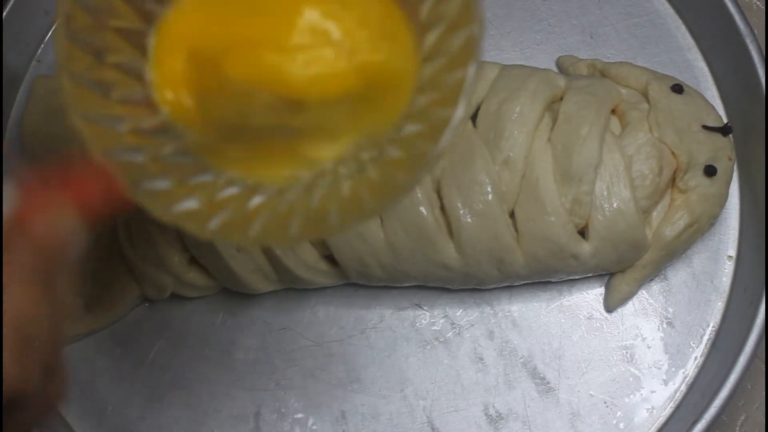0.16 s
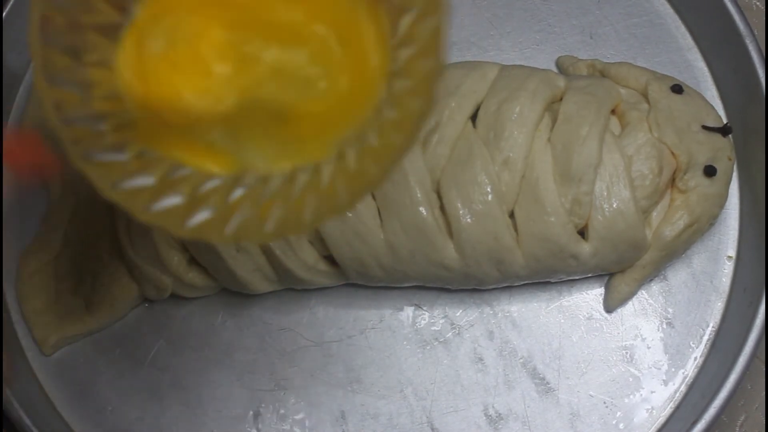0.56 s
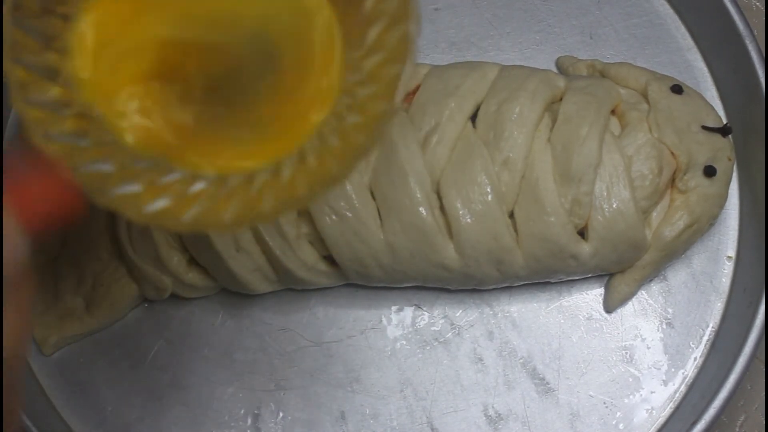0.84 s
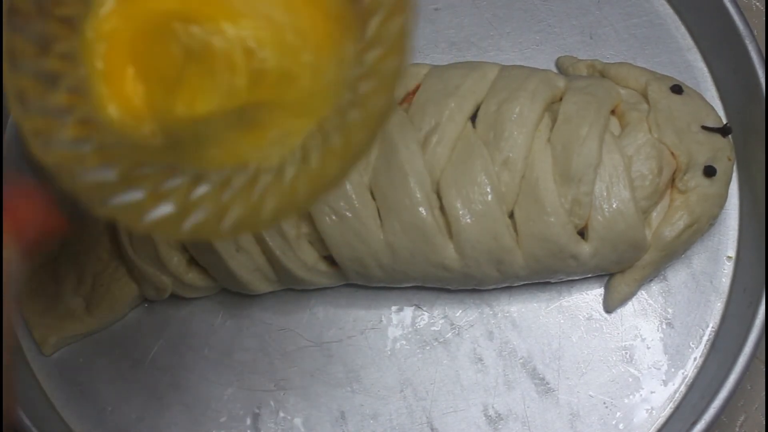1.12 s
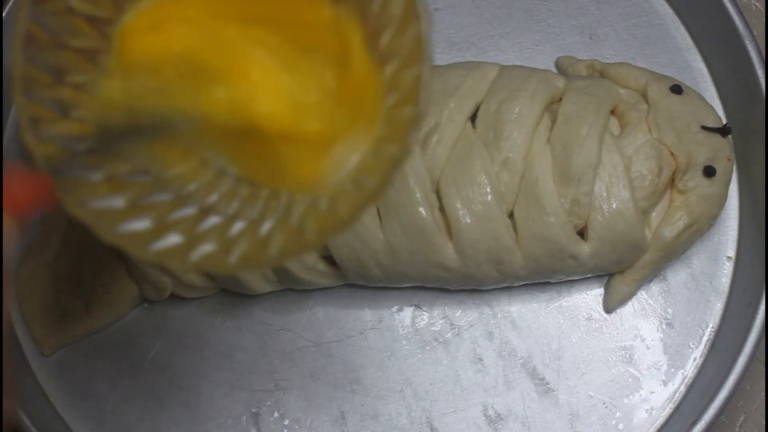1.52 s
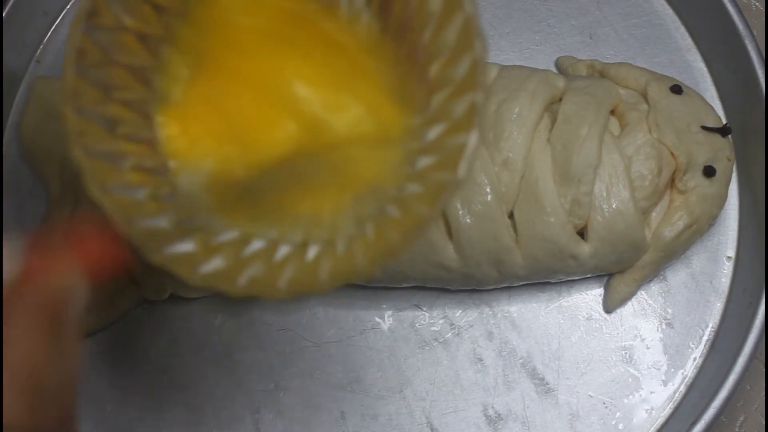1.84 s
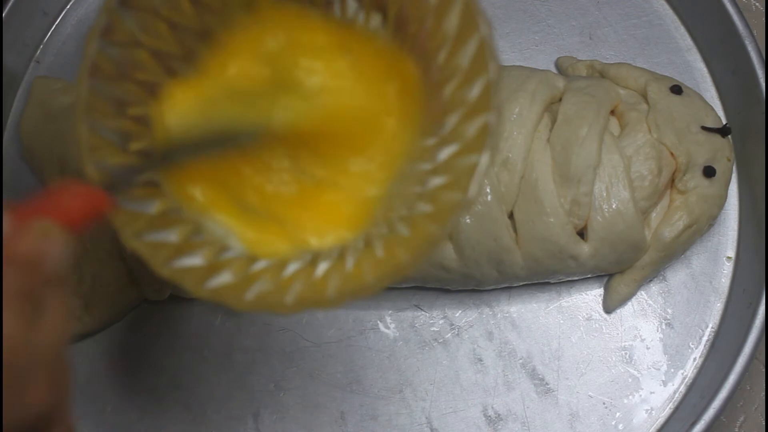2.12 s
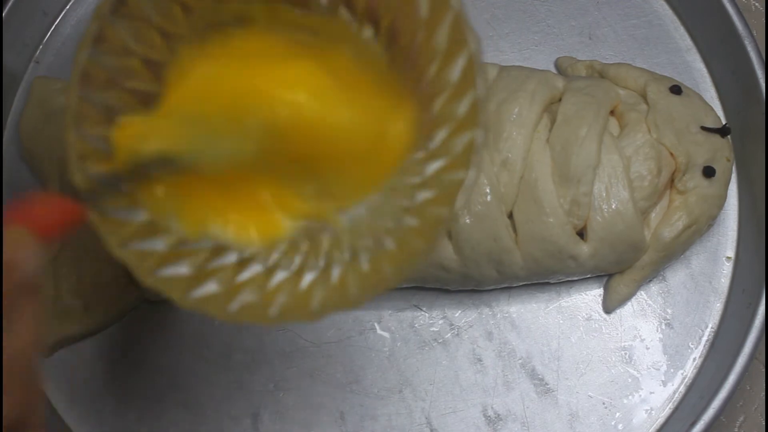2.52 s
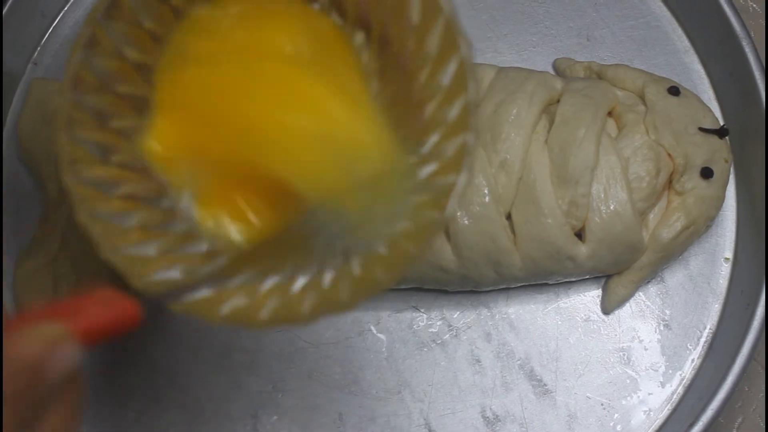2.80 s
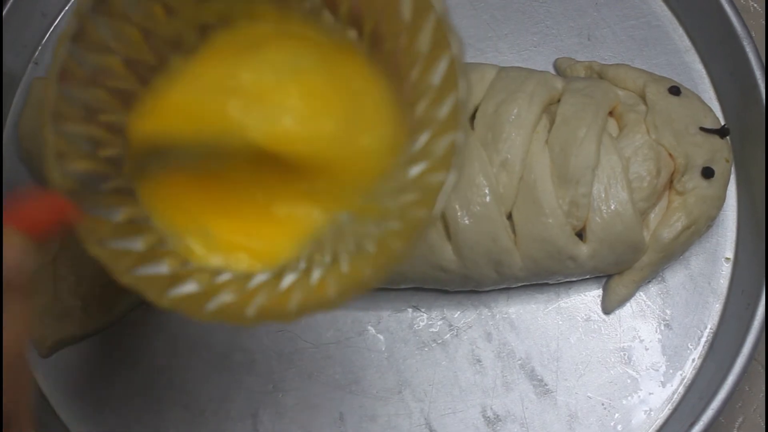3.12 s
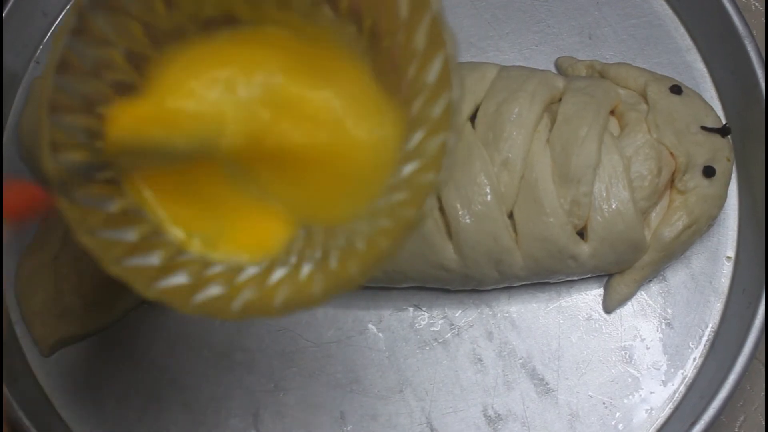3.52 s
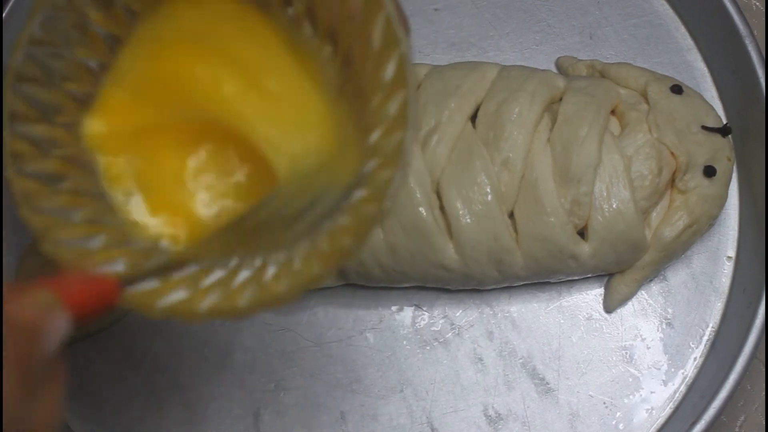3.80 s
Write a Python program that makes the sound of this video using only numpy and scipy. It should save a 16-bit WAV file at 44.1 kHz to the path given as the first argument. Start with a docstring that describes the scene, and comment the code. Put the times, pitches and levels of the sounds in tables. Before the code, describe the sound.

Fast, steady egg beating: metal tines click brightly on egg-damped glass, ringing the rim briefly on a few early strokes, then duller and wetter, with light scrapes and soft thuds, heard close in a small quiet kitchen.

```python
"""A quiet kitchen: a steel fork beats an egg in a small hand-held glass bowl, about five strokes a second.
Each stroke lands as a few tine contacts: a bright tick of decaying modes plus a noise crack, a short knock
of the egg-damped wall and bottom, sometimes a free ring of the rim in beating sines. Wet tines patter on as
random clicks into resonators; some scrape, some strokes thud. A noise tail answers as the room, over faint
hum, hiss and tones."""
import sys
import numpy as np
from scipy import signal
from scipy.io import wavfile

SR = 44100
rng = np.random.default_rng(int(sys.argv[2]) if len(sys.argv) > 2 else 0)


def unload_audio(sound):
    """Save the sound as a 16-bit wav file, at the path given as the first command line argument."""
    columns = np.transpose(np.atleast_2d(sound))
    # keep every value between -1 and 1, then stretch to whole-number steps
    steps = np.round(np.clip(columns, -1, 1) * 32767)
    wavfile.write(sys.argv[1], SR, steps.astype(np.int16))


N = 174195

# Tine contacts, shared by ticks, knocks and patter. Each row: start in seconds, tick level in dB,
# wall level in dB, wall pitch in Hz, bottom level in dB, bottom pitch in Hz.
TINE_CONTACTS = [(0.0997, -13, -33, 2430, -23, 1596), (0.1219, -39, -31.5, 3210, -33, 1690),
                 (0.156, -37, -48, 3230, -42.5, 1560), (0.162, -37.5, -47, 2530, -45, 1550),
                 (0.2284, -47.5, -72, 2160, -55, 800), (0.2799, -7.5, -14.5, 2790, -58.5, 1800),
                 (0.2874, -15, -55.5, 3760, -41, 1560), (0.31, -52, -43, 2730, -37, 1090),
                 (0.322, -33.5, -32, 2160, -40, 1810), (0.3246, -22, -32, 2260, -40, 1690),
                 (0.4296, -44, -58, 3800, -59.5, 1150), (0.4507, -46, -66, 2670, -63, 1130),
                 (0.4821, -4.5, -19, 3920, -25, 1670), (0.4955, -46.5, -46, 3900, -31.5, 1730),
                 (0.5022, -32, -53, 3160, -33.5, 1870), (0.5225, -32, -31, 3360, -36.5, 1800),
                 (0.6779, -35, -48.5, 2880, -51.5, 1350), (0.6843, -13.5, -33.5, 3890, -32, 1480),
                 (0.6994, -21.5, -32.5, 3180, -44, 1366), (0.861, -20, -43, 3190, -60.5, 1410),
                 (0.8746, -15, -36, 4930, -37.5, 1700), (0.889, -24.5, -29.5, 3440, -42.5, 1770),
                 (0.898, -31.5, -36.5, 2710, -58, 1910), (1.0506, -8.5, -19.5, 3890, -32.5, 1410),
                 (1.0605, -9, -27, 3820, -58, 1710), (1.0767, -40, -27.5, 2485, -40.5, 1015),
                 (1.0854, -48, -50, 3250, -58, 1740), (1.18, -57, -52, 3820, -61, 1640),
                 (1.1995, -40, -42, 2780, -39.5, 1465), (1.22, -55, -58.5, 3800, -53, 1504),
                 (1.2382, -14.5, -30.5, 2820, -18, 920), (1.2438, -24.5, -22.5, 3955, -33, 920),
                 (1.2472, -12.5, -36, 2760, -19.5, 1315), (1.258, -25, -28.5, 3070, -44, 1420),
                 (1.2745, -23, -26, 4150, -36, 1150), (1.355, -50.5, -52, 3800, -60, 1220),
                 (1.427, -30.5, -41.5, 4150, -49, 1410), (1.4354, -13, -31.5, 2890, -30.5, 1627),
                 (1.4569, -19, -34.5, 2600, -47, 1410), (1.629, -15, -36, 3210, -42.5, 1370),
                 (1.6418, -26.5, -34.5, 2360, -41.5, 2080), (1.6523, -41, -38.5, 3250, -51, 1370),
                 (1.812, -33, -64, 3770, -56, 970), (1.823, -18.5, -33, 2110, -31.5, 1550),
                 (1.8354, -22.5, -30, 2384, -47, 1584), (1.8524, -42, -36, 3250, -44.5, 1770),
                 (1.9996, -33.5, -43.5, 2620, -43, 1603), (2.0252, -16, -35.5, 3560, -44.5, 2040),
                 (2.04, -16, -27, 3650, -58.5, 2020), (2.1748, -15.5, -37, 2130, -22, 1730),
                 (2.207, -15, -38, 3830, -28.5, 1555), (2.2291, -34.5, -31.5, 3250, -47.5, 1690),
                 (2.3954, -18, -32.5, 2650, -41, 1810), (2.4056, -14.5, -29, 3720, -28.5, 1607),
                 (2.4278, -24.5, -31.5, 3250, -48, 1736), (2.4447, -43, -39, 3310, -44, 1125),
                 (2.4665, -41, -37.5, 3360, -62, 1630), (2.5938, -37.5, -42, 2520, -68, 1200),
                 (2.6049, -12, -21.5, 3740, -26, 1548), (2.6256, -18, -27.5, 3160, -34.5, 1730),
                 (2.8097, -17, -27, 3210, -38, 1550), (2.811, -34, -33, 2730, -30.5, 1333),
                 (2.8187, -16.5, -23, 3710, -20.5, 1492), (2.8463, -49, -35, 3220, -38.5, 1553),
                 (2.8782, -42, -36.5, 3380, -66, 1520), (3, -32.5, -45.5, 3650, -55, 1576),
                 (3.0138, -12, -33.5, 3740, -30, 1620), (3.025, -37.5, -29, 2620, -53, 1500),
                 (3.0584, -35.5, -29, 2390, -35.5, 1800), (3.216, -12, -33, 2720, -33.5, 1646),
                 (3.2345, -39, -35, 3700, -32.5, 1310), (3.253, -41, -28.5, 4070, -52, 1780),
                 (3.339, -44, -52, 2570, -53, 1260), (3.4027, -40, -36, 3880, -49.5, 1486),
                 (3.4118, -11.5, -42, 4020, -31, 1533), (3.418, -27.5, -29.5, 3000, -43.5, 1480),
                 (3.4332, -16, -25.5, 3230, -44, 2060), (3.48, -37.5, -39.5, 3370, -46, 2020),
                 (3.6108, -11, -35.5, 3530, -33, 1630), (3.6229, -33, -37, 3310, -41.5, 1950),
                 (3.7692, -18, -39, 2300, -35, 1700), (3.7899, -43.5, -46, 3710, -47, 1790),
                 (3.8035, -13.5, -37, 2130, -32.5, 1650), (3.83, -29, -33, 2310, -34.5, 1727),
                 (3.8338, -18, -35, 3380, -37, 1586)]
# Bright modes of tines and glass. Each row: frequency in Hz, level in dB relative to the other modes.
TICK_PARTIALS = [(5300, -13), (6410, -13), (7590, -13), (8910, -11.5), (9990, -15), (11400, -4.5),
                 (12600, -8.5), (13700, -10.5), (15500, -16.5)]
TICK_T60_S, TICK_RISE_S = 0.007, 0.00015
TICK_DETUNE_RATIO, TICK_SPREAD_DB = 0.02, 4
CRACK_DECAY_S, CRACK_DB = 0.0012, -6
TICK_HIGHPASS_HZ = 4800


def ticks():
    """Bright modes start together, strength and pitch shifting with the spot hit; a short crack joins in."""
    start_s, tick_db = np.transpose(TINE_CONTACTS)[:2]
    t = np.arange(3000) / SR
    hz, level_db = np.transpose(TICK_PARTIALS)
    luck = rng.standard_normal((len(start_s), len(t) + 2 * len(hz)))
    hiss = luck[:, :len(t)]
    strength, detune = np.split(luck[:, len(t):, None], 2, axis=1)
    mode_hz = hz[:, None] * (1 + TICK_DETUNE_RATIO * detune)
    modes = amp(level_db[:, None] + TICK_SPREAD_DB * strength) * np.sin(2 * np.pi * mode_hz * t)
    crack = amp(CRACK_DB) * hiss * np.exp(-t / CRACK_DECAY_S)
    tick = amp(-60 * t / TICK_T60_S) * modes.sum(axis=1) + crack
    tick = tick * (1 - np.exp(-t / TICK_RISE_S))
    tick = signal.sosfilt(signal.butter(4, TICK_HIGHPASS_HZ, "high", fs=SR, output="sos"), tick)
    # equal energy per tick before its level: 40 samples' worth of unit power
    unit_tick = tick / np.sqrt(np.sum(tick ** 2, axis=1, keepdims=True) / 40)
    return lay(start_s, amp(tick_db[:, None]) * unit_tick)


# Egg-damped bowl modes stirred by every knock.
# Each row: frequency in Hz, level in dB relative to the knock, T60 in seconds.
DAMPED_MODES = [(920, -30, 0.033), (1315, -26, 0.017), (1539, -14, 0.073), (1730, -5, 0.016),
                (2320, -15, 0.026), (2720, -11.5, 0.014), (3250, -5, 0.023), (3880, -11.5, 0.045)]
BOWL_SPLIT_HZ = 2000  # modes above follow the wall level, the rest the bottom level
WALL_T60_S, BOTTOM_T60_S = 0.031, 0.04
WALL_RISE_S, BOTTOM_RISE_S = 0.00018, 0.00028


def knocks():
    """Wall and bottom knock at a pitch set by how the egg lies, and stir the other damped modes."""
    start_s, _, wall_db, wall_hz, bottom_db, bottom_hz = np.transpose(TINE_CONTACTS)
    out, t = np.zeros(N), np.arange(4000) / SR
    parts = ((wall_db, wall_hz, WALL_T60_S, WALL_RISE_S),
             (bottom_db, bottom_hz, BOTTOM_T60_S, BOTTOM_RISE_S))
    for db, hz, t60_s, rise_s in parts:
        tone = amp(db[:, None] - 60 * t / t60_s) * np.sin(2 * np.pi * hz[:, None] * t)
        out += lay(start_s, tone * (1 - np.exp(-t / rise_s)))
    luck = rng.standard_normal((len(start_s), len(DAMPED_MODES)))
    for k, (hz, level_db, t60_s) in enumerate(DAMPED_MODES):
        db = wall_db if hz > BOWL_SPLIT_HZ else bottom_db
        sign, spread = np.sign(luck[:, k]), amp(3 * luck[:, k - 1])
        push = clicks_at(start_s, amp(db + level_db) * sign * spread)
        # subtracting a fast-dying copy softens the onset
        out += ring(push, hz, t60_s) - ring(push, hz, WALL_RISE_S * np.log(1000))
    return out


# Blows above the egg. Each row: start in seconds, level in dB of each of the four free modes in turn,
# level in dB of each shimmer mode, time in seconds until egg washes over the rim.
RIM_STRIKES = [(.001, -53, -62, -72, -71, -80, 0.05), (.289, -46, -37, -52, -64, -70, 0.18),
               (0.481, -40, -41, -46, -56, -52, 0.19), (1.059, -40, -50, -52, -44, -62, 0.11),
               (1.245, -60, -38, -52, -56, -60, 0.06), (2.176, -58, -48, -52, -56, -62, 0.04)]
# Free rim modes. Each row: frequency in Hz, T60 in seconds.
FREE_RIM_MODES = [(1753, .4), (3876, .45), (6510, .35), (9760, .18)]
RIM_WASH_DECAY_S = 0.018
TWIN_OFFSET_HZ, TWIN_DB = 14, -10  # offset is scaled by 0.5 to 1.5 per blow
SHIMMER_HZ, SHIMMER_T60_S = (6440, 7700), 0.24  # T60 is scaled by 0.5 to 1.5 per mode


def rim():
    """Clean blows ring the free glass: each mode beats with a weaker twin, a crowd of weak modes shimmers."""
    start_s, *mode_db, shimmer_db, free_s = np.transpose(RIM_STRIKES)[:, :, None]
    t = np.arange(SR // 3) / SR
    luck = rng.random((len(start_s), 3, 20, 1))
    tones = 0
    for k, (hz, t60_s) in enumerate(FREE_RIM_MODES):
        twin_hz = hz + TWIN_OFFSET_HZ * (0.5 + luck[:, 0, k])
        twin = amp(TWIN_DB) * np.sin(2 * np.pi * (twin_hz * t + luck[:, 1, k]))
        pair = np.sin(2 * np.pi * hz * t) + twin
        tones = tones + amp(mode_db[k] - 60 * t / t60_s) * pair
    crowd_hz = SHIMMER_HZ[0] + np.ptp(SHIMMER_HZ) * luck[:, 2]
    crowd_t60_s = SHIMMER_T60_S * (0.5 + luck[:, 0])
    crowd = amp(-60 * t / crowd_t60_s) * np.sin(2 * np.pi * (crowd_hz * t + luck[:, 1]))
    tones = tones + amp(shimmer_db) * crowd.sum(axis=1)
    wash = np.exp(-np.maximum(t - free_s, 0) / RIM_WASH_DECAY_S)
    return lay(start_s[:, 0], tones * wash)


# Patter spectrum. Each row: frequency in Hz, level in dB.
PATTER_COLOUR = [(1100, -15.5), (1600, -3), (2200, 0), (2850, 5.5), (3280, 10), (3700, 2.5), (4400, -4),
                 (7000, 6.5), (16000, -4.5)]
PATTER_PER_S, PATTER_T60_S = 4000, 0.14
PATTER_DB = -20.5  # relative to the wall level of the contact that starts it
PATTER_UNEVEN_DB, PATTER_CLUMP_DB = 3.03, 3


def patter():
    """Small wet contacts, random clicks dealt to short resonators, die away after every landing."""
    start_s, _, wall_db = np.transpose(TINE_CONTACTS)[:3]
    power_decay = amp(-120 / (PATTER_T60_S * SR))  # 60 dB of power per T60
    power = signal.lfilter([1], [1, -power_decay], clicks_at(start_s, amp(2 * wall_db)))
    sizes = amp(PATTER_UNEVEN_DB * np.minimum(rng.exponential(1, N), 4)) * rng.choice([-1, 1], N)
    hits = rng.random(N) < PATTER_PER_S / SR
    grains = np.sqrt(power) * sizes * hits * amp(PATTER_CLUMP_DB * drift(90))
    dealt, pitches_hz = rng.integers(0, 36, N), np.geomspace(1100, 15500, 36)
    out = np.zeros(N)
    for k, hz in enumerate(pitches_hz):
        out += amp(at_hz(PATTER_COLOUR, hz)) * ring(grains * (dealt == k), hz, 53.7 / hz)
    return amp(PATTER_DB) * out


# Wet tines dragged along the wall. Each row: start in seconds, length in seconds, slip level in dB.
TINE_SCRAPES = [(2.222, 0.076, -48), (2.43, 0.056, -52), (2.63, 0.052, -48.5), (2.84, 0.047, -51.5)]
SLIPS_PER_S, SCRAPE_HZ, SCRAPE_T60_S = 900, (3200, 3300, 3480), 0.03


def scrapes():
    """Dense random slips, swelling and fading over each drag, stir the wall modes near 3.3 kHz."""
    t = np.arange(N) / SR
    stroke = np.zeros(N)
    for start_s, length_s, db in TINE_SCRAPES:
        stroke += amp(db) * np.sin(np.pi * np.clip((t - start_s) / length_s, 0, 1))
    out = np.zeros(N)
    for hz in SCRAPE_HZ:
        slips = stroke * rng.standard_normal(N) * (rng.random(N) < SLIPS_PER_S / SR)
        out += ring(slips, hz, SCRAPE_T60_S)
    return out


# Dull thuds of egg and hand. Each row: start in seconds, noise level in dB before the envelope.
DULL_THUDS = [(.482, -61), (1.272, -51), (1.83, -49.5), (2.819, -48.5), (3.233, -51), (3.395, -44.5)]
THUD_BAND_HZ, THUD_DECAY_S = (173.2, 740), 0.019


def thuds():
    """Egg and hand give short puffs of low band-passed noise under some strokes."""
    start_s, db = np.transpose(DULL_THUDS)
    t = np.arange(4000) / SR
    band = signal.butter(2, THUD_BAND_HZ, "band", fs=SR, output="sos")
    puff = signal.sosfilt(band, rng.standard_normal((len(start_s), len(t))))
    envelope = np.sqrt(t / THUD_DECAY_S) * np.exp(-t / THUD_DECAY_S)
    return lay(start_s, amp(db[:, None]) * puff / puff.std() * envelope)


# Room decay. Each row: frequency in Hz, T60 in seconds.
ROOM_DECAY = [(700, 0.34), (2100, 0.31), (5500, 0.22), (14000, 0.15)]
ROOM_DB, ROOM_FADE_IN_S = -16.5, 0.0014


def kitchen(x):
    """The room answers with a noise tail that dies band by band."""
    t = np.arange(SR // 2) / SR
    white = rng.standard_normal(len(t))
    tail = np.zeros(len(t))
    for hz, sos in bands(300, 17000, count=10):
        tail += signal.sosfilt(sos, white) * amp(-60 * t / at_hz(ROOM_DECAY, hz))
    tail = tail * np.clip(t / ROOM_FADE_IN_S, 0, 1)
    unit_tail = tail / np.sqrt(np.sum(tail ** 2))
    return amp(ROOM_DB) * signal.fftconvolve(x, unit_tail)[:N]


# Low background level. Each row: time in seconds, level in dB.
HUM_LEVEL = [(0, -58), (0.501, -62), (1.3, -63.5), (2.3, -59), (3.4, -57.5), (3.95, -64)]
# Low background spectrum. Each row: frequency in Hz, relative density in dB per Hz.
HUM_SPECTRUM = [(45, -8.5), (70, -26), (100, -6.5), (130, -3), (200, -2.5), (240, -7), (300, -5), (600, -9),
                (1000, -11.5)]
PATCHY_DB = 1.2  # band flicker, hum and hiss


def hum():
    """Low noise shaped by band, its level following a slow curve."""
    level_db = np.interp(np.arange(N) / SR, *np.transpose(HUM_LEVEL))
    return amp(level_db) * noise(HUM_SPECTRUM, 37.6, 1097, PATCHY_DB)


# Hiss spectrum. Each row: frequency in Hz, relative density in dB per Hz.
HISS_SPECTRUM = [(700, -14), (1500, 2), (3000, -4.5), (5000, -10.5), (9000, -17.5), (16000, -16)]
HISS_DB = -62.5


def hiss():
    """Steady-level noise shaped by band, each band flickering."""
    return amp(HISS_DB) * noise(HISS_SPECTRUM, 800, 16000, PATCHY_DB)


# Wavering lines in the hum. Each row: centre frequency in Hz, centre level in dB.
HUM_LINES = [(100, -71.5), (200, -70.5), (300, -71.5)]
# Faint passing tones. Each row: start in seconds, length in seconds, first Hz, last Hz, level in dB.
GLIDING_TONES = [(2.12, .24, 560, 545, -65), (2.5, .3, 1170, 1230, -70), (3.07, .14, 420, 415, -65)]


def background_tones():
    """Sines with drifting pitch and level form the hum lines; brief sines glide, swell and fade."""
    t = np.arange(N) / SR
    out = np.zeros(N)
    for hz, db in HUM_LINES:
        level = amp(db + 3 * drift(12))
        out += level * np.sin(2 * np.pi * np.cumsum(hz + 5 * drift(9)) / SR)
    for start_s, length_s, from_hz, to_hz, db in GLIDING_TONES:
        part = np.clip((t - start_s) / length_s, 0, 1)
        level = amp(db + 2 * drift(30)) * np.sin(np.pi * part)
        glide_hz = from_hz + (to_hz - from_hz) * part
        out += level * np.sin(2 * np.pi * np.cumsum(glide_hz) / SR)
    return out


def amp(db):
    """dB to gain."""
    return 10 ** (np.asarray(db) / 20)


def at_hz(points, hz):
    """Interpolate a (Hz, value) table on a log-frequency axis."""
    table_hz, values = np.transpose(points)
    return np.interp(np.log(hz), np.log(table_hz), values)


def ring(clicks, hz, t60_s):
    """Two-pole resonator: a unit click starts a decaying sine of initial height 1."""
    radius, w = amp(-60 / (t60_s * SR)), 2 * np.pi * hz / SR
    poles = [1, -2 * radius * np.cos(w), radius * radius]
    return signal.lfilter([0, np.sin(w)], poles, clicks + 1e-18)  # offset avoids denormals


def clicks_at(start_s, gain):
    """Single-sample clicks at the given times."""
    out = np.zeros(N)
    np.add.at(out, (np.asarray(start_s) * SR).astype(int), gain)
    return out


def lay(start_s, shapes):
    """Add one short shape at each time."""
    out = np.zeros(N + shapes.shape[1])
    index = (start_s * SR).astype(int)[:, None] + np.arange(shapes.shape[1])
    np.add.at(out, index, shapes)
    return out[:N]


def drift(rate_hz):
    """Random knots of spread 1, rate_hz per second, joined by straight lines."""
    knots = rng.standard_normal(400)
    return np.interp(np.arange(N) * rate_hz / SR, np.arange(len(knots)), knots)


def bands(low_hz, high_hz, count):
    """Neighbouring band-passes, log-spaced, each with its centre in Hz."""
    edges = np.geomspace(low_hz, high_hz, count + 1)
    return [(np.sqrt(a * b), signal.butter(2, [a, b], "band", fs=SR, output="sos"))
            for a, b in zip(edges, edges[1:])]


def noise(spectrum, low_hz, high_hz, patchy_db):
    """Bands of noise, each flickering a little; scaled to rms 1."""
    white = rng.standard_normal((2, N))
    out = np.zeros(N)
    for k, (hz, sos) in enumerate(bands(low_hz, high_hz, count=16)):
        gain = amp(at_hz(spectrum, hz) + patchy_db * drift(8))
        out += gain * signal.sosfilt(sos, white[k % 2])  # neighbours use separate noise
    return out / out.std()


RADIATES_ABOVE_HZ = 845


def scene():
    """Bowl, room and background; so small a bowl sends out no bass."""
    bowl = ticks() + knocks() + rim() + patter() + scrapes()
    bowl = signal.sosfilt(signal.butter(4, RADIATES_ABOVE_HZ, "high", fs=SR, output="sos"), bowl)
    return (bowl + thuds() + kitchen(bowl) + hum() + hiss() + background_tones())[None]


OVERLOAD, CUTOFF_HZ = 1.0, 17000


def record(dry):
    """The highest peaks are rounded by tanh, the top is cut by a steep low-pass."""
    rounded = OVERLOAD * np.tanh(dry / OVERLOAD)
    return signal.sosfilt(signal.cheby2(16, 70, CUTOFF_HZ, fs=SR, output="sos"), rounded)


dry = scene()
out = record(dry)
unload_audio(out)
```